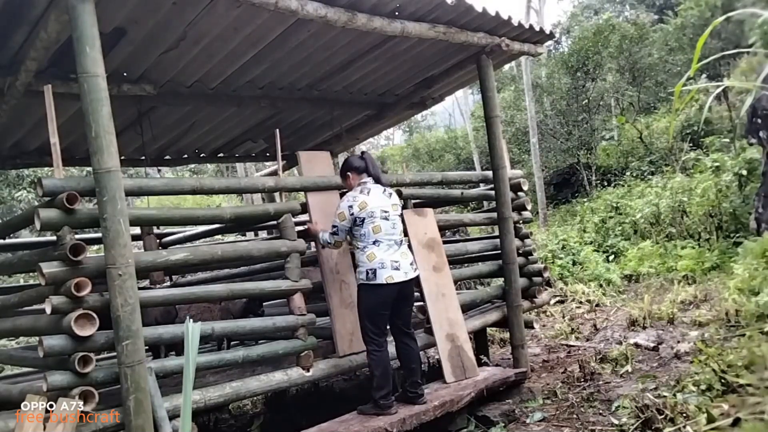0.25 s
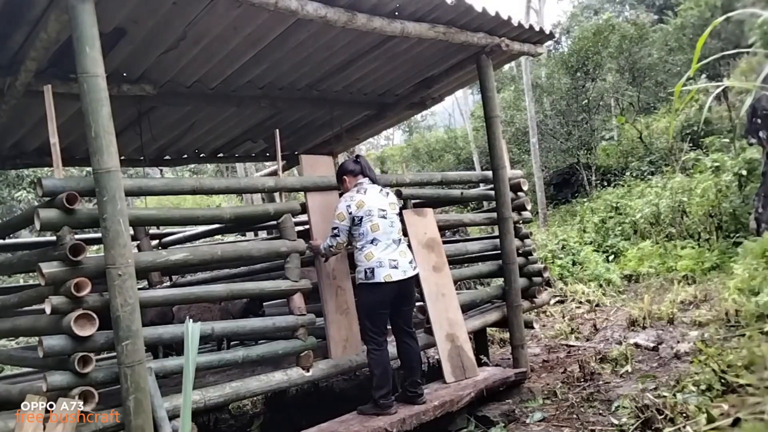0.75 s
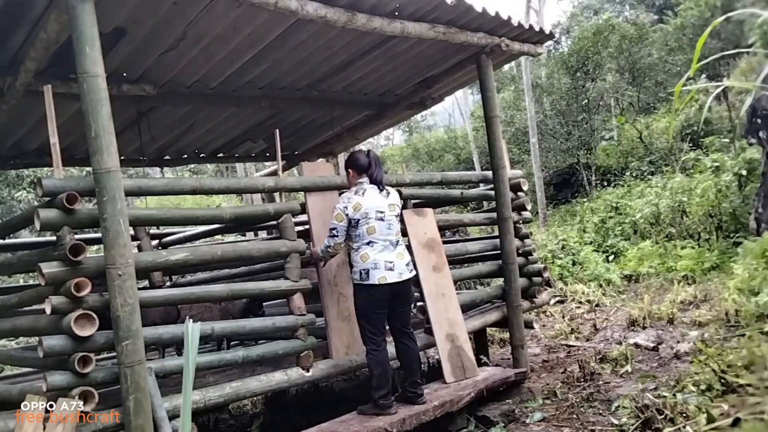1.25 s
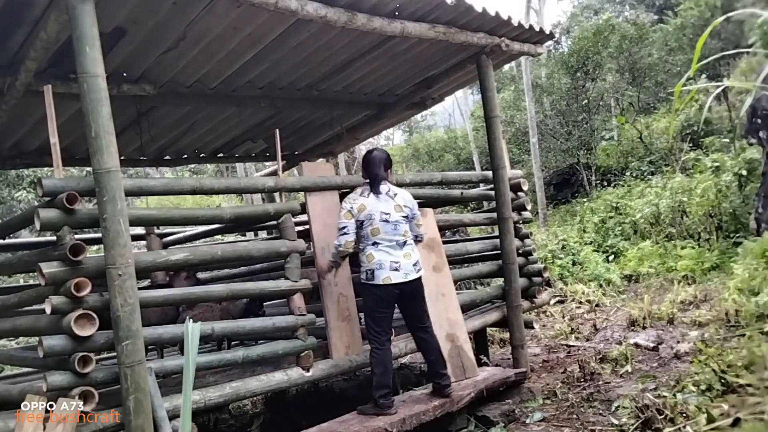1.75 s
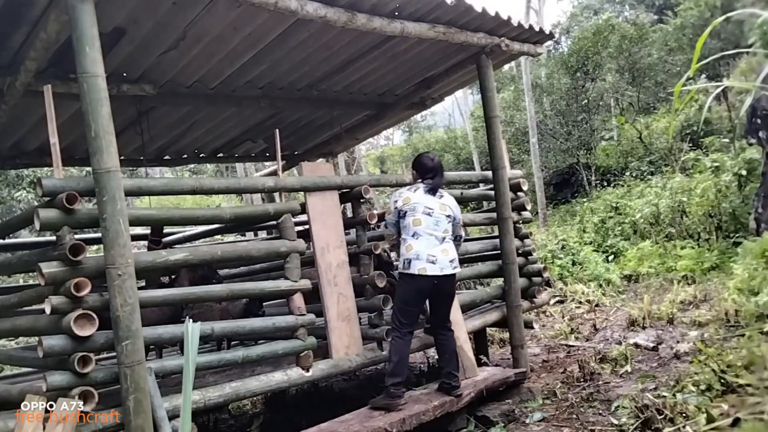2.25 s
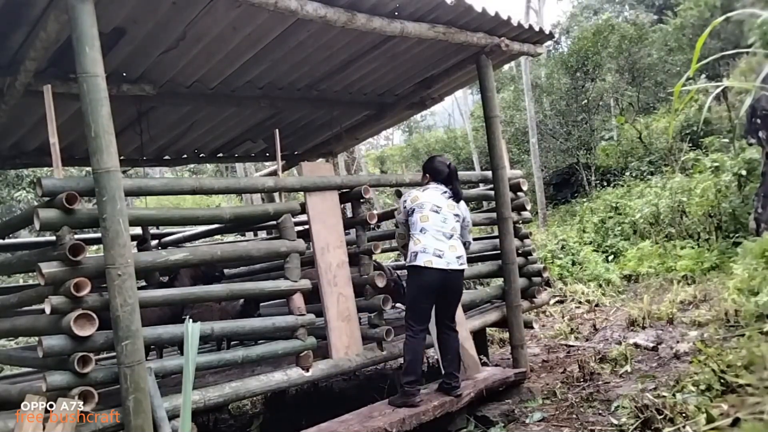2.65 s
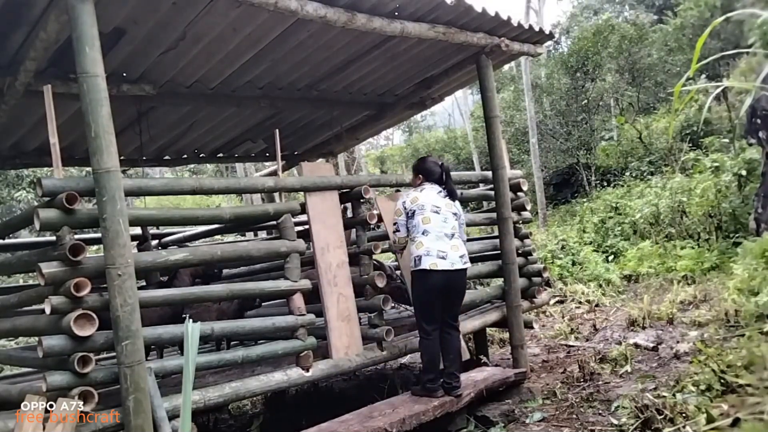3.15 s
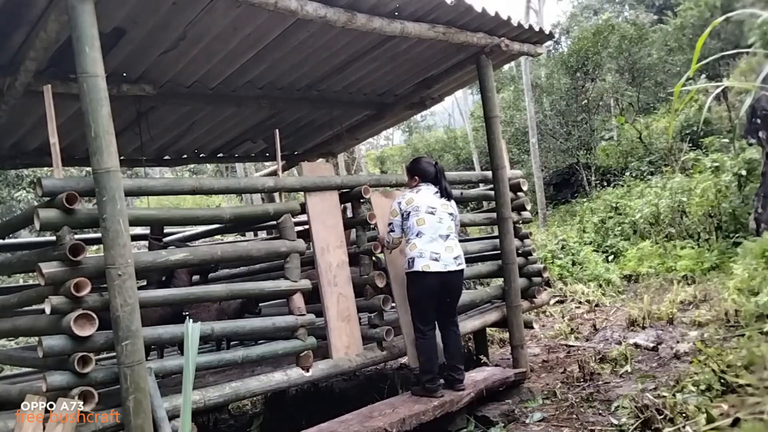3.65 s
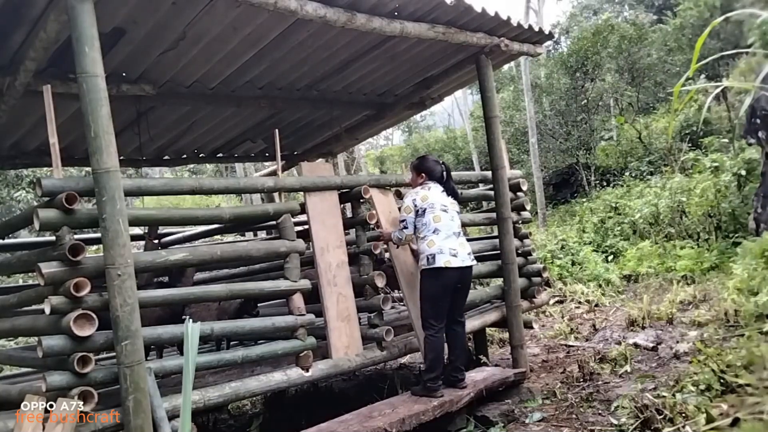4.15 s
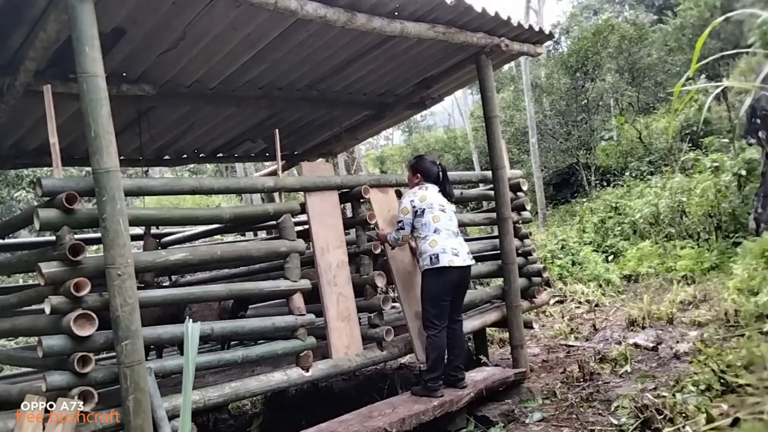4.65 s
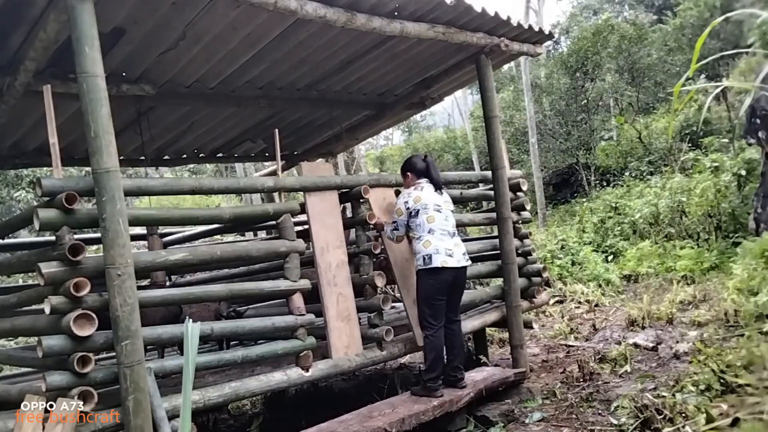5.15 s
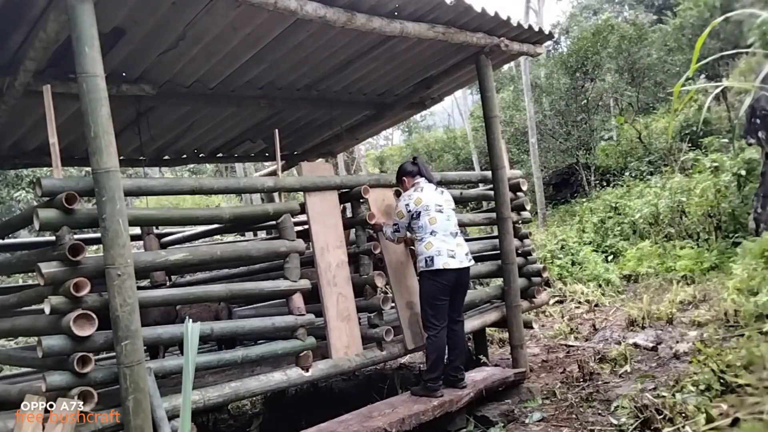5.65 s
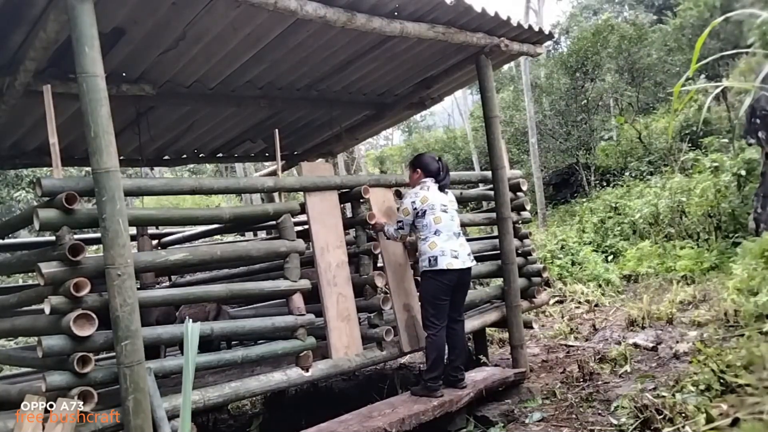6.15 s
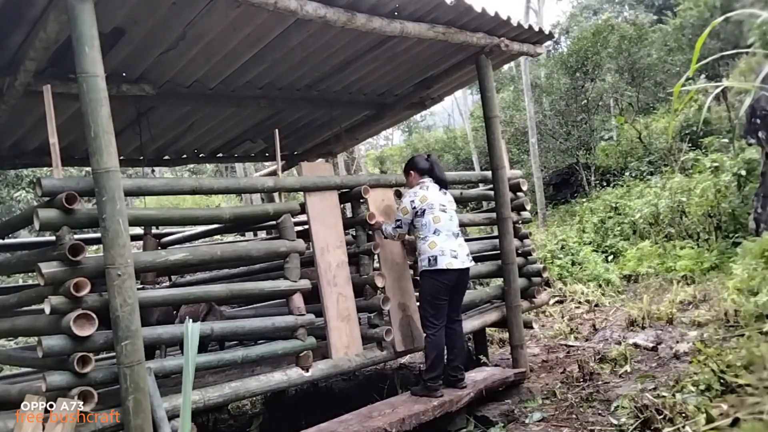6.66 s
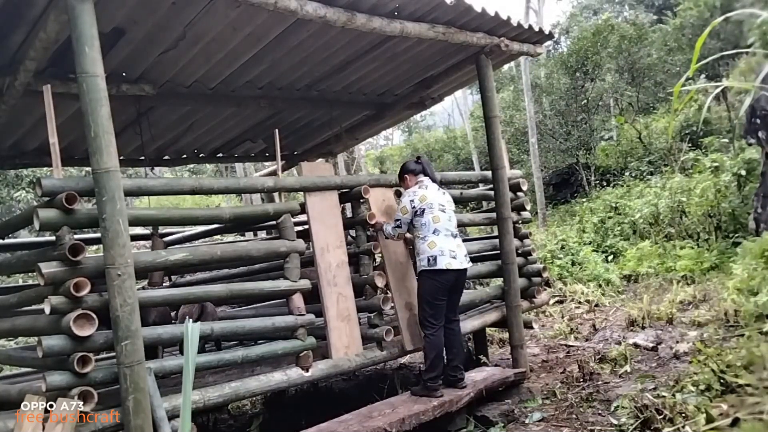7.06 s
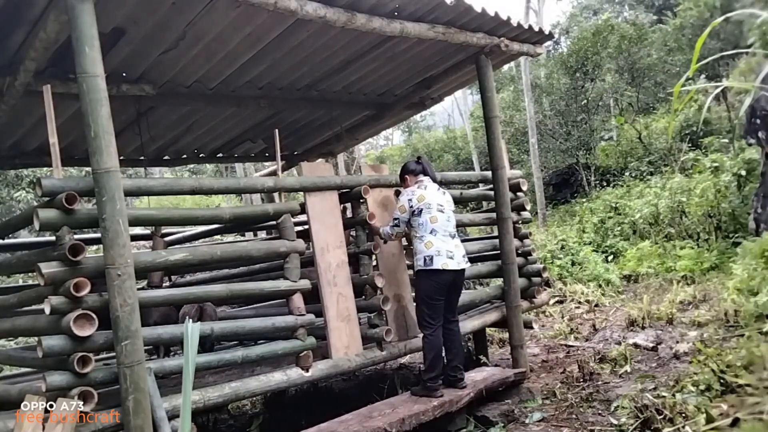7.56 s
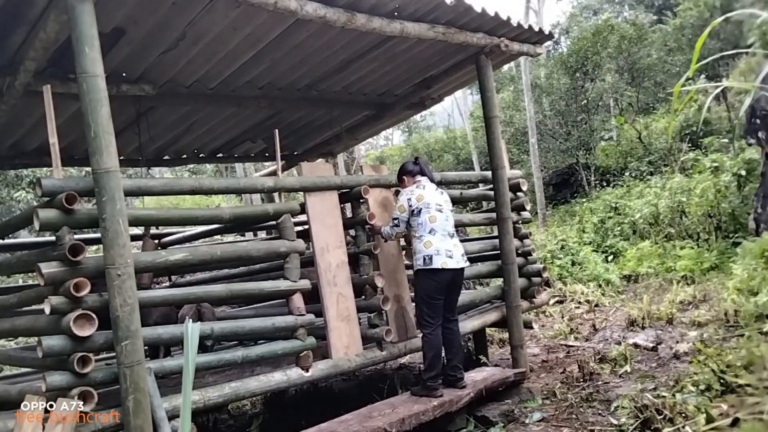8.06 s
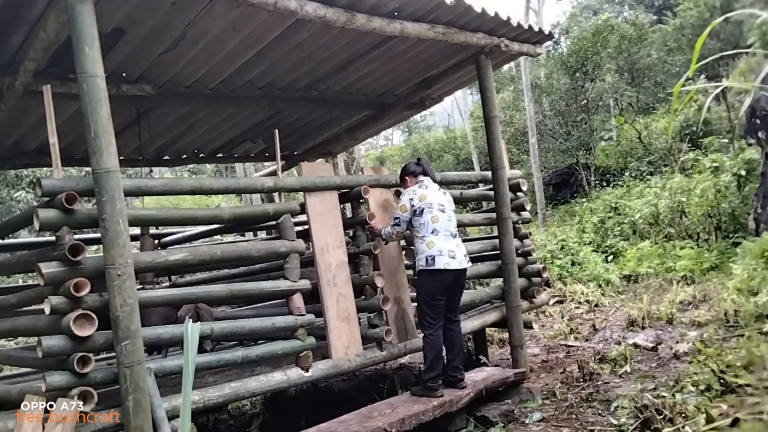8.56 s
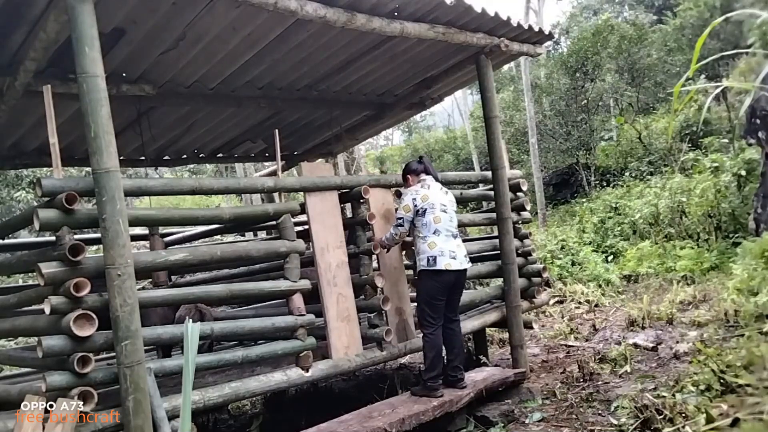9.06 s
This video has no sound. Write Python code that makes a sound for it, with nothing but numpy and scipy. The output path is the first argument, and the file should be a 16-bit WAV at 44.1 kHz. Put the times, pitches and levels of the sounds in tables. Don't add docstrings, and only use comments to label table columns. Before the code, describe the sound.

Heard from a phone close to a bamboo goat pen beneath a low roof. At 0-0.3 s several sharp, dry plank cracks and hollow pole knocks burst out, followed by lighter snaps. A larger neck bell clanks at 0.9 s; softer small-bell touches come at 1.3 and 1.8 s. From 2.3 to 3.5 s the small bell clanks in bright, rapid, quickly damped clusters. Between 3.6 and 5.4 s there are mostly faint taps, straw rustle and hoof bumps. A loud wood crack lands at 5.6 s. Mixed bells return at 6.3-6.9 s, then the larger bell strikes in two hard double clanks at 7.3-7.4 s. Small knocks and rustling continue until a final small-bell clank at 9.1 s. A very faint cricket trills far away. Treble is brittle and right-heavy; tiny silent gaps interrupt everything about three times a second.

```python
import sys
import numpy as np
from scipy import signal
from scipy.fft import rfft, irfft
from scipy.io import wavfile

SR = 44100
rng = np.random.default_rng(int(sys.argv[2]) if len(sys.argv) > 2 else 0)


def log_audio(samples):
    frames = np.atleast_2d(samples).T
    limited = np.clip(frames, -1, 1)
    pcm = np.round(limited * 32767).astype(np.int16)
    wavfile.write(sys.argv[1], SR, pcm)


def voltage_ratio(decibels):
    exponent = np.asarray(decibels, float) / 20
    return 10 ** exponent


N = 410130

# start in seconds, then levels in dB of the 8.5 kHz pair,
# the hum, the 9.2 kHz group and the rim partials.
SMALL_BLOWS = [(1.3135, -38, -40, -34.5, -37), (1.3178, -38, -29, -30.5, -33.5),
               (1.425, -48.5, -71, -46.5, -59), (1.462, -63, -59.5, -56, -65),
               (1.8348, -44.5, -34.5, -44, -43), (2.2044, -77.5, -59, -84, -83),
               (2.2714, -17.5, -42, -25, -35.5), (2.2985, -30, -34, -37.5, -35),
               (2.319, -30, -82, -34, -65), (2.334, -45, -74, -46, -53), (2.4844, -37.5, -42.5, -39, -43),
               (2.5094, -39.5, -63, -42, -48), (2.552, -49.5, -65, -51, -59.5),
               (2.588, -55, -70, -61, -60.5), (2.6094, -54, -58, -60, -60), (2.634, -60.5, -89, -62.5, -71),
               (2.7816, -56, -43, -53, -56), (2.817, -57, -62.5, -60, -64), (2.835, -22, -35.5, -45, -34),
               (2.8546, -24, -46, -48, -37.5), (2.9259, -22.5, -52, -28.5, -32.5),
               (2.9477, -27, -66, -42, -50), (2.992, -42, -52, -60, -56), (3.3145, -65, -59, -65, -69),
               (3.4905, -21, -47, -43, -37), (3.503, -22, -47, -57, -41.5), (6.4073, -20, -34, -38, -35.5),
               (6.4214, -27.5, -38, -48, -41), (6.436, -43, -33.5, -51, -53), (6.54, -57.5, -59, -60, -57),
               (6.625, -65, -66, -73, -66), (6.7312, -42, -34, -29.5, -39), (6.776, -65, -65, -52, -65),
               (9.0605, -30, -38, -32.5, -43.5), (9.074, -30.5, -44, -56, -46),
               (9.1516, -45, -57.5, -69, -67)]
# pitch in Hz, level in dB, t60 in seconds.
SMALL_BELL = [(1425, 0, 0.27), (1368, -6.5, 0.07), (3730, -20.5, .14), (3747, -17, 0.21), (7084, 2, 0.19),
              (7300, -12, 0.18), (8500, -2.5, 0.077), (8512, 3.5, 0.082), (9060, 5.5, 0.21),
              (9250, 4.5, 0.2), (8770, -3, .12), (9270, -7.5, 0.12), (9432, -8, 0.11), (9380, -1, 0.12),
              (9730, 4.5, .13), (11420, -5.5, 0.14), (11730, -6, 0.084), (12960, -4.5, 0.081),
              (13310, -5.5, 0.096), (13710, -13, .12), (14570, -4, .13), (15450, -9, 0.14)]
SMALL_GROUP_EDGES_HZ = [3750, 8000, 8900, 9500]
# start in seconds, then levels in dB of the 8.8 kHz group, the hum,
# the 3.8-5.1 kHz group and the rim partials.
LARGE_BLOWS = [
    (0.908, -29.5, -48, -46.5, -48),
    (0.946, -61.5, -67, -69, -65),
    (7.2925, -22, -42, -46.5, -27.5),
    (7.3093, -20, -54, -44.5, -27.5),
    (7.4106, -22.5, -32.5, -46, -29),
    (7.4244, -22.5, -43.5, -36.5, -29),
]
# pitch in Hz, level in dB, t60 in seconds.
LARGE_BELL = [(758.4, -6.5, 0.95), (940, -5.5, 0.061), (2040, -13.5, 0.56), (3840, -11.5, 0.35),
              (5067, 1.5, 0.41), (5583, 3.5, 0.3), (5670, -7.5, 0.34), (5800, 1.5, 0.18), (6225, -15, 0.3),
              (6784, -12, 0.16), (7190, -4, 0.18), (7437, 1.5, 0.21), (7779, -6, 0.17), (8290, -7.5, 0.14),
              (8758, -3, 0.12), (9071, -4.5, 0.14), (9270, -8.5, 0.148), (9850, -5, 0.155),
              (10020, -1, 0.18), (10470, -9, 0.15), (11820, -18, 0.11), (12360, -9, 0.22), (13100, -7, .14),
              (13030, -3, 0.16), (14140, -11, 0.21), (14720, -9, 0.088), (15150, -16, .15),
              (15540, -10, 0.083)]
LARGE_GROUP_EDGES_HZ = [2500, 5300, 5750, 8000, 9500]
# pitch in Hz, level in dB, t60 in seconds.
THIN_BELL = [(2470, -15, 0.059), (5870, -35, .2), (6800, -17, .17), (7181, -20, .15), (9260, 4, 0.18),
             (10020, -24, .18), (11260, -26, .2), (14230, -17, .05)]
DULL_BELL = [(1427, -21, 0.75), (3833, -14, 0.29), (7144, -2, 0.39), (7180, 4, 0.27), (9000, 2, .17),
             (9119, -7, 0.24), (9600, -1, 0.21), (9760, 7, 0.19), (11480, -12, 0.11), (13560, -19, .2),
             (13870, -15, .2), (15640, -19, .16)]
# start in seconds, level in dB.
THIN_BLOWS = [
    (6.3365, -33.5),
    (6.349, -39.5),
]
DULL_BLOWS = [
    (6.864, -34.5),
    (6.884, -44),
    (6.899, -40.5),
]
SCRATCH_DB = -6
CHOKE_DB, CHOKE_S = -10.5, 0.0064

# pitch in Hz, level in dB, t60 in seconds.
POLES = [(133, -4, 0.074), (178, -1, 0.1), (201, 0.5, 0.16), (259, -3, 0.059), (373.6, -9, 0.21),
         (461.7, -6, 0.11), (543, -1, 0.04), (614, 0, 0.073), (653, -4, 0.013), (822, -3, 0.017),
         (954, -4.5, 0.087), (1106, -8.5, 0.028), (1280, -16, 0.03)]
# frequency in Hz, level in dB per Hz.
CRACK = [(1300, -17.5), (3000, -20.5), (5000, -14.5), (7000, -7.5), (8200, -5.5), (9000, 0.5), (9900, -12),
         (11000, -16.5), (15800, -20)]
# start in seconds, crack, thud and knock in dB, t60 in seconds.
HOOVES = [(0.0383, -26, -20, -21.5, 0.16), (0.0562, -22.5, -34, -33.5, 0.61),
          (0.18, -16, -35.5, -33.5, 0.17), (0.3042, -50, -45, -55.5, 0.22), (0.589, -49, -57, -45, .12),
          (1.0738, -38, -38.5, -48.5, 0.17), (1.189, -37, -51, -73, 0.071), (1.2589, -68, -37.5, -69, 0.42),
          (1.8158, -24.5, -50, -48.5, 0.078), (3.933, -50, -60.5, -66, 0.12),
          (4.954, -28.5, -46.5, -39, 0.16), (5.415, -45, -44, -49, 0.21), (5.919, -42, -70, -69.5, 0.24),
          (6.293, -38, -45.5, -56, 0.4), (6.7522, -25, -39, -35.5, 0.12), (6.854, -26.5, -54, -50.5, 0.25),
          (7.1864, -85, -39, -50.5, 0.66), (7.64, -57, -40, -38.5, 0.079), (7.7611, -40, -58.5, -83, 0.11),
          (8.5878, -43, -64, -76, 0.16), (9.0486, -35.5, -40.5, -48.5, 0.4), (9.1529, -26, -59, -57, 0.064),
          (9.2536, -24.5, -77, -74, 0.95)]
# start in seconds, crack, knock and clack in dB, t60 in seconds.
PLANKS = [(0.0476, -8.5, -15.5, -33, 0.11), (0.1227, -6.5, -19, -20, 0.097),
          (0.4534, -54, -50.5, -62.5, 0.16), (0.9841, -34, -54, -55.5, 0.12),
          (1.117, -36.5, -50, -59, 0.25), (1.23, -36, -53, -53.5, 0.24), (2.271, -21.5, -64, -49.5, 0.18),
          (2.821, -24.5, -47, -50, 0.14), (4.017, -40.5, -58.5, -61, 0.23),
          (4.068, -34.5, -60, -56.5, 0.19), (4.2377, -35, -53, -45.5, 0.13), (4.569, -44, -65, -64.5, 0.19),
          (4.7624, -47, -61.5, -62, 0.14), (5.2812, -45, -52, -61, 0.4), (5.3622, -32, -35, -47, 0.097),
          (5.58, -2, -34, -22.5, 0.077), (6.6677, -36, -39.5, -45, 0.21), (6.7136, -65, -28, -73, 0.18),
          (7.5262, -43, -39, -75, 0.057), (7.9437, -34.5, -48, -54, 0.35), (7.9986, -43.5, -54, -58, 0.44),
          (8.3695, -45, -55, -50.5, 0.042), (8.8173, -39.5, -60.5, -59, 0.37),
          (8.9124, -41, -50, -62, 0.13)]
# start in seconds, crack in dB, t60 in seconds.
SNAPS = [(0.101, -21, 0.046), (0.421, -28, 0.19), (0.5418, -38.5, 0.17), (0.797, -28, 0.2),
         (1.086, -29.5, 0.046), (1.6593, -32, 0.18), (1.733, -44, 0.19), (1.7868, -27, 0.2),
         (2.136, -39.5, 0.16), (2.453, -42, 0.25), (2.557, -31, 0.18), (2.915, -28.5, 0.28),
         (3.285, -37, 0.072), (3.495, -28.5, 0.1), (3.716, -34.5, 0.14), (4.908, -38.5, 0.18),
         (5.8218, -30.5, 0.051), (5.875, -32, 0.11), (6.245, -49.5, 0.1), (6.537, -25.5, 0.043),
         (7.879, -37.5, 0.38), (8.199, -58, 0.092), (8.318, -37.5, 0.22), (8.422, -39, 0.098),
         (8.712, -33, 0.068), (8.784, -39, 0.11)]
THUD_TOP_HZ, TOP_HZ = 330, 17500
HOOF_CLACK_SHARE, HOOF_CLACK_DB = 0.74, -15
PLANK_THUD_DB = -22
SNAP_THUD_DB, SNAP_KNOCK_DB, SNAP_CLACK_DB = -40.5, -28.5, -25
# start in seconds, peak
# in dB, pitch in Hz, t60 in seconds.
TAPS = [(0.965, -49, 960, 0.1), (1.118, -36, 9000, 0.033), (1.231, -37, 8800, 0.028),
        (1.01, -57, 1430, .05), (2.445, -58, 2470, 0.057), (2.545, -57, 640, .06), (2.566, -56, 2860, .03),
        (2.575, -56, 890, .06), (2.765, -56, 810, 0.09), (2.817, -44, 2000, .02), (2.912, -40, 1130, 0.03),
        (4.022, -64, 1010, 0.03), (4.124, -65, 740, .04), (4.238, -48.5, 2050, 0.034),
        (4.453, -78.5, 754, .04), (4.565, -57, 624, 0.035), (4.644, -60, 482, .05), (4.79, -60.5, 477, .05),
        (5.592, -33, 738, 0.067), (6.507, -51, 818, 0.13), (6.655, -53, 706, 0.043),
        (6.671, -32, 2037, 0.036), (6.685, -40, 1980, 0.038), (6.745, -33, 2900, 0.025),
        (6.972, -45, 1340, 0.055), (7.53, -46, 424, 0.076), (7.57, -41.5, 486, .08),
        (7.645, -51, 450, 0.053), (7.859, -73, 757, 0.032), (7.943, -52, 900, 0.03),
        (8.205, -66.5, 458, 0.11), (8.322, -49.5, 1070, 0.027), (8.378, -48, 865, 0.082),
        (8.595, -58, 426, 0.054), (8.651, -60.5, 910, 0.042), (8.709, -56, 676, 0.037),
        (8.733, -64, 890, 0.023), (8.818, -49.5, 1025, 0.064), (8.821, -48, 2030, 0.026),
        (8.875, -68, 423, 0.059), (8.922, -52, 488, 0.054), (9.045, -55.5, 450, 0.043),
        (9.138, -44, 2950, 0.033), (9.221, -69.5, 864, 0.045), (9.282, -52.5, 793, 0.066),
        (0.1221, -14, 600, 0.038), (0.151, -41, 178, 0.15), (5.365, -36, 476, 0.16),
         (5.375, -42, 273, 0.096), (5.6, -47.5, 182, 0.18), (5.53, -51, 500, .1), (7.191, -52, 130, 0.23),
         (7.523, -51, 154, .22), (7.639, -50, 163, 0.22), (7.998, -52, 457, 0.28), (0.054, -25, 264, .13),
         (9.051, -47.5, 143, 0.21)]
# ratio to its pitch, level in dB.
TAP_OVERTONES = [(1, 0.5), (1.13, -8.5), (2.3, -11.5), (3.9, -11.5)]

# height in seconds, tread in dB, rustle in dB,
# seconds to die by 20 dB.
BOUTS = [(.15, -52, -62, 0.3), (.36, -65.5, -56.5, 1.5), (.83, -60.5, -54, -0.05), (1.03, -64, -54, 0.18),
         (1.291, -61, -57, 0.4), (1.496, -66.5, -58.5, -1.5), (1.84, -58, -42, 0.1654),
         (2.43, -68, -54, 0.54), (2.919, -63, -54.5, 0.56), (3.3, -84.5, -59.5, 0.27),
         (3.57, -65.5, -53.5, 0.28), (4.14, -73, -60.5, 0.4), (5.1, -63, -64.5, 0.38),
         (5.501, -53.5, -48.5, 0.36), (5.681, -70, -64.5, 0.5), (6.5, -64, -50, 0.33),
         (6.861, -54.5, -51.5, 0.29), (7.2, -55, -55.5, -0.03), (7.429, -57, -51.5, 0.53),
         (7.639, -71, -87, -0.4), (8.222, -69, -51, 0.16), (8.379, -80, -49.5, -0.12), (8.62, -69, -60, -8),
         (8.819, -70.5, -66.5, 2), (9.2, -71.5, -55.5, 0.45)]
RISE_SHARE = 0.81
STILL_TREAD_DB, STILL_RUSTLE_DB = -75.5, -74
SHUFFLE_SHARE, SHUFFLE_DB = 0.5, -0.17
# frequency in Hz, level in dB per Hz.
AIR = [(15, -26.5), (22, -3.5), (31, -28.5), (55, -26.5), (126, -14), (216, -17.5), (361, -18),
       (691, -19.5), (929, -19), (1060, -21.5), (1680, -24), (2660, -24.5), (6490, -21), (8970, -6.5),
       (11100, -21.5), (15800, -19)]
# frequency in Hz, left-right likeness (0 to 1).
LIKENESS = [(60, 0.8), (400, 0.56), (1200, 0.042), (2500, 0.12), (5000, 0.02)]
CRICKET_HZ, CRICKET_DB, CRICKET_PER_S = 3740, -83, 40
ROOF_T60_S, ROOF_DB = 0.2, -8

# frequency in Hz, level in dB.
LEFT_PORT = [(60, -0.5), (1000, -1), (2500, -2), (4500, -6.5), (6000, -14), (7500, -21), (9000, -32),
             (10200, -20), (11200, -11), (13000, -6.5), (14200, -7.5), (15500, -8.5)]
PORT_LAG = 4
HISS_DB = -81.5
MIC_TOP_HZ = 16500
FIRST_STALL_S, PLAY_S = 0.0112, 0.3215
STALL_MS = [17.8, 16.7, 16, 13.4, 18.8, 19.4, 20.3, 20.9, 17.3, 19.9, 18.3, 17.4, 22.5, 14.7, 15.8, 16.2,
            14.3, 14.4, 16.8, 19.7, 20.7, 26, 15.5, 18.5, 14.2, 16.7, 19.3, 17.5]
# start in seconds, length in seconds.
HICCUPS = [
    (1.1025, .0095),
    (6.2239, .0132),
]


def bell(blows, modes, edges_hz, order, rise_s, rough):
    out, ticks = np.zeros((2, N)), np.zeros(N)
    column = np.array(order)[np.searchsorted(edges_hz, np.array(modes)[:, 0])]
    for row in blows:
        sound = clank(modes, np.array(row)[column], played(row[0]), rise_s, rough)
        length_s = sound.shape[1] / SR
        later = [s - row[0] for s, *_ in blows if 0 < s - row[0] < length_s]
        since = np.arange(sound.shape[1]) / SR - np.reshape(later, (-1, 1))
        choke_db = CHOKE_DB * np.clip(since / CHOKE_S, 0, 1).sum(axis=0)
        add(out, row[0], sound * voltage_ratio(choke_db))
        add(ticks, row[0], voltage_ratio(row[-1] + SCRATCH_DB) * swell(np.arange(4000) / SR, 0.0045))
    noise = rng.standard_normal(N)
    scratch = rms_one(band(noise, 5800, TOP_HZ)) + voltage_ratio(-16) * rms_one(band(noise, 3300, 6200))
    return out + ticks * scratch


def clank(modes, mode_db, s, rise_s, rough):
    t = np.arange(SR * 4 // 9) / SR
    hz = np.array(modes)[:, :1]
    in_step = 2 * np.pi * s * hz[:, 0]
    chance = np.transpose([2.3 * rng.standard_normal(len(modes)), in_step])
    ring = partials(modes, mode_db, chance, t)
    knots = rng.standard_normal((2, len(modes), 92))
    part, whole = np.modf(t / 0.005)
    whole = whole.astype(int)
    waver = knots[..., whole] + np.diff(knots)[..., whole] * part
    depth = rough * (0.24 + 0.95 * np.exp(-t / 0.035))
    attack = (1 - np.exp(-t / rise_s)) * (1 + 0.23 * swell(t, 0.03))
    wavering = np.einsum("mt,cmt->ct", ring * np.clip(hz / 2600, 0, 1), waver)
    return attack * (ring.sum(axis=0) + depth * wavering)


def knocks():
    wood, body, clack, crack = np.zeros((4, N))
    low, t = np.array(POLES)[:, 0] < THUD_TOP_HZ, np.arange(SR // 3) / SR
    for s, crack_db, thud_db, knock_db, clack_db, t60 in contacts():
        rise_s = 0.077 * t60 ** 2 + 0.0004
        dying = voltage_ratio(-60 * t / np.clip(t60, 0.02, 0.5)) + 0.41 * voltage_ratio(-60 * t / 0.0045)
        dying = dying * (1 - np.exp(-t / rise_s))
        pole = np.array(POLES) * [1 + 0.05 * rng.standard_normal(), 1, 1]
        signs = np.pi * np.arange(len(pole))
        chance = np.transpose([4.9 * rng.standard_normal(len(pole)), signs])
        ring = partials(pole, np.where(low, thud_db, knock_db), chance, t[:SR // 6]).sum(axis=0)
        rattle = (rng.standard_normal(len(t)) * dying)[:SR // 5]
        add(wood, s, signal.fftconvolve(ring, rattle / np.sqrt(np.sum(rattle ** 2))))
        add(body, s, voltage_ratio(knock_db) * dying)
        add(clack, s, voltage_ratio(clack_db) * dying)
        add(crack, s, voltage_ratio(crack_db - 7.5) * dying)
    shared, left, right = (colour(w, CRACK) for w in rng.standard_normal((3, N)))
    grit = shared + 1.4 * np.array([left, right])
    wood = high_pass(wood, 4, 118)
    white = rng.standard_normal((3, N))
    fence = rms_one(band(white[0] + 0.4 * white[1:], 280, 1300))
    boom = body * fence * voltage_ratio(-4.5)
    clacking = clack * rms_one(band(grit, 1300, 4800)) * voltage_ratio(5.0)
    cracking = crack * rms_one(band(grit, 6900, TOP_HZ))
    return voltage_ratio(-5.0) * wood + boom + clacking + cracking


def contacts():
    out = []
    for s, crack, thud, knock, t60 in HOOVES:
        clack = HOOF_CLACK_SHARE * crack + (1 - HOOF_CLACK_SHARE) * knock + HOOF_CLACK_DB
        out.append((s, crack, thud, knock, clack, t60))
    for s, crack, knock, clack, t60 in PLANKS:
        out.append((s, crack, knock + PLANK_THUD_DB, knock, clack, t60))
    for s, db, t60 in SNAPS:
        out.append((s, db, db + SNAP_THUD_DB, db + SNAP_KNOCK_DB, db + SNAP_CLACK_DB, t60))
    return sorted(out)


def taps():
    out, t = np.zeros(N), np.arange(SR // 5) / SR
    ratio, over_db = np.transpose(TAP_OVERTONES)
    for s, db, hz, t60 in TAPS:
        chance = rng.standard_normal((3, len(ratio)))
        detune = 1 + 0.044 * chance[0] * (ratio > 1)
        pitch = np.minimum(hz * ratio * detune, TOP_HZ)
        modes = np.transpose([pitch, over_db, np.clip(t60, 0.01, 0.3) / np.sqrt(ratio)])
        ring = partials(modes, np.full(len(ratio), db), chance[1:].T * [2.5, 0], t).sum(axis=0)
        rattle = rng.standard_normal(300) * voltage_ratio(-60 * t[:300] / 0.008)
        add(out, s, signal.fftconvolve(ring, rattle / np.sqrt(np.sum(rattle ** 2))) * 1.18)
    return high_pass(out, 4, 110)


def stirring(patchy_db):
    levels = movement()
    layers, edges, together = np.zeros((3, 2, N)), 31 * 2 ** np.arange(0, 9.1, 0.5), drift(14)
    shaped = np.array([colour(w, AIR) for w in rng.standard_normal((4, N))]).reshape(2, 2, N)
    for k, (low, high) in enumerate(zip(edges, edges[1:])):
        centre_hz = np.sqrt(low * high)
        mid, side = band(shaped[k % 2], low, high)
        alike = np.clip(at_hz(LIKENESS, centre_hz), 0, 1)
        gain = voltage_ratio(patchy_db * (0.8 * together + drift(5.4)))
        both = np.sqrt(1 + alike) * mid + np.sqrt(1 - alike) * side * [[1], [-1]]
        layers[np.searchsorted([500, 5200], centre_hz)] += gain * both
    return sum(voltage_ratio(db + trim_db) * rms_one(x) for db, trim_db, x in zip(levels, (1.5, 3.0, 5.5), layers))


def movement():
    t = np.arange(0, N, 64) / SR
    s, tread_db, rustle_db, die_s = np.transpose(BOUTS)[:, :, None]
    s = played(s)
    away = np.where(t < s, (s - t) / RISE_SHARE, t - s)
    loss_db = 20 * away / np.maximum(die_s, 0.05)

    def over_still(db, still_db):
        return 10 * np.log10(voltage_ratio(2 * still_db) + voltage_ratio(2 * (db - loss_db)).sum(axis=0))

    tread = over_still(tread_db, STILL_TREAD_DB)
    rustle = over_still(rustle_db, STILL_RUSTLE_DB)
    shuffle = SHUFFLE_SHARE * tread + (1 - SHUFFLE_SHARE) * rustle + SHUFFLE_DB
    return [np.interp(np.arange(N) / SR, t, c) for c in (tread, shuffle, rustle)]


def cricket():
    t = np.arange(N) / SR
    pulses = np.maximum(np.sin(2 * np.pi * CRICKET_PER_S * t + 3 * drift(2.6)), 0)
    tone = rms_one(band(rng.standard_normal(N), CRICKET_HZ - 90, CRICKET_HZ + 90))
    return voltage_ratio(CRICKET_DB + 2 * drift(1.5)) * pulses * tone


def roof(x):
    t = np.arange(SR // 3) / SR
    noise = rng.standard_normal((3, len(t)))
    shared = signal.sosfilt(signal.butter(2, 1500, fs=SR, output="sos"), noise[2])
    own = high_pass(noise[:2], 2, 500)
    echo = (shared + own) * voltage_ratio(-60 * t / ROOF_T60_S) * np.clip(t / 0.0013 - 0.3, 0, 1)
    echo = echo / np.sqrt(np.sum(echo ** 2, axis=1, keepdims=True))
    return voltage_ratio(ROOF_DB) * signal.fftconvolve(x, echo, axes=1)[:, :N]


def stalls():
    out, s = list(HICCUPS), FIRST_STALL_S
    for ms in STALL_MS:
        out.append((s, ms / 1000))
        s += ms / 1000 + PLAY_S
        s += sum(length for at, length in HICCUPS if s - PLAY_S < at < s)
    return out


def played(s):
    at, length = np.transpose(sorted(stalls()))
    lost = np.cumsum(length)
    corners = np.ravel([at, at + length], "F")
    return s - np.interp(s, corners, np.ravel([lost - length, lost], "F"))


def partials(modes, mode_db, chance, t):
    hz, own_db, t60 = np.transpose(modes)[:, :, None]
    level = voltage_ratio(own_db + mode_db[:, None] + chance[:, :1] - 60 * t / t60)
    return level * np.sin(2 * np.pi * hz * t + chance[:, 1:])


def swell(t, rise_s):
    return t / rise_s * np.exp(1 - t / rise_s)


def drift(rate):
    r = np.exp(-80 * np.pi * rate / SR)
    slow = signal.lfilter([1], [1, -2 * r, r * r], rng.standard_normal(N // 40 + 2002))[2000:]
    return np.interp(np.arange(N) / 40, np.arange(len(slow)), rms_one(slow))


def rms_one(x):
    return x / np.sqrt(np.mean(x ** 2) + 1e-20)


def at_hz(points, hz):
    table_hz, value = np.transpose(points)
    return np.interp(np.log(hz + 1), np.log(table_hz), value)


def add(out, s, sound):
    at = round(played(s) * SR)
    out[..., at:at + sound.shape[-1]] += sound[..., :N - at]


def colour(x, points):
    cepstrum = irfft(np.log(voltage_ratio(at_hz(points, np.arange(2049) * SR / 4096))))
    cepstrum[1:2048] *= 2
    cepstrum[2049:] = 0
    response = irfft(np.exp(rfft(cepstrum)))[:1024]
    return signal.oaconvolve(x, response)[:N]


def band(x, low_hz, high_hz):
    return signal.sosfilt(signal.butter(2, [low_hz, high_hz], "band", fs=SR, output="sos"), x)


def high_pass(x, order, hz):
    return signal.sosfilt(signal.butter(order, hz, "high", fs=SR, output="sos"), x)


def scene():
    small = bell(SMALL_BLOWS, SMALL_BELL, SMALL_GROUP_EDGES_HZ, order=[2, 4, 1, 3, 4], rise_s=0.0019, rough=0.84)
    large = bell(LARGE_BLOWS, LARGE_BELL, LARGE_GROUP_EDGES_HZ, order=[2, 3, 2, 4, 1, 4], rise_s=0.0032, rough=1.0)
    thin = bell(THIN_BLOWS, THIN_BELL, [], order=[1], rise_s=0.0024, rough=0.74)
    dull = bell(DULL_BLOWS, DULL_BELL, [], order=[1], rise_s=0.0045, rough=0.77)
    bells = voltage_ratio(-1.5) * small + large + thin + dull
    near = bells + voltage_ratio(-0.5) * knocks() + taps()
    hush = stirring(patchy_db=4.0) * voltage_ratio(np.array([[-4.0], [0]]))
    return near + roof(near) + hush + cricket()


def low_pass(x):
    return signal.sosfilt(signal.butter(12, 16800, fs=SR, output="sos"), x)


def record(dry):
    x = np.array([colour(dry[0], LEFT_PORT), np.roll(dry[1], PORT_LAG)])
    x = x + voltage_ratio(HISS_DB) * np.diff(rng.standard_normal((2, N + 1)))
    x = signal.sosfilt(signal.cheby2(12, 50, MIC_TOP_HZ, fs=SR, output="sos"), x)
    playing, stream = np.ones(N, bool), np.zeros_like(x)
    for s, length in stalls():
        playing[round(s * SR):round((s + length) * SR)] = False
    stream[:, playing] = x[:, :playing.sum()]
    return low_pass(stream)


dry = scene()
out = record(dry)
log_audio(out)
```